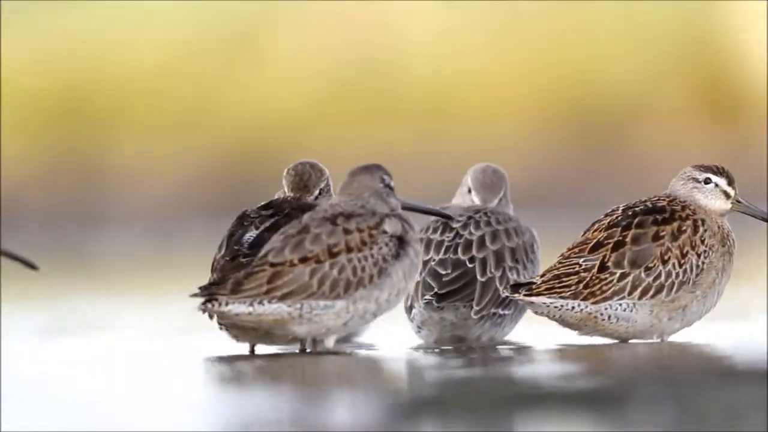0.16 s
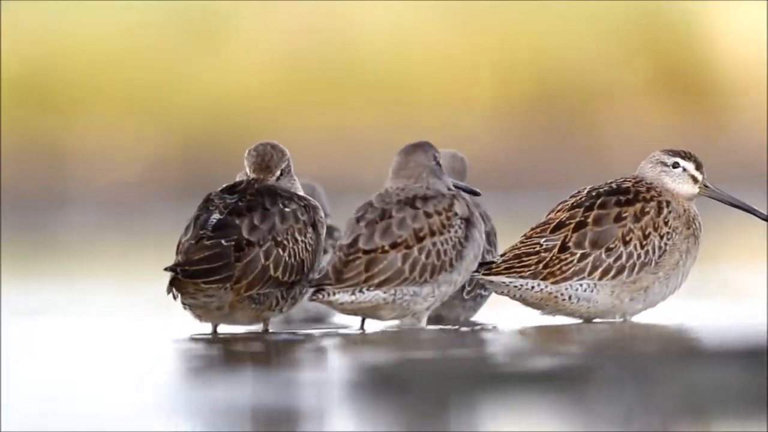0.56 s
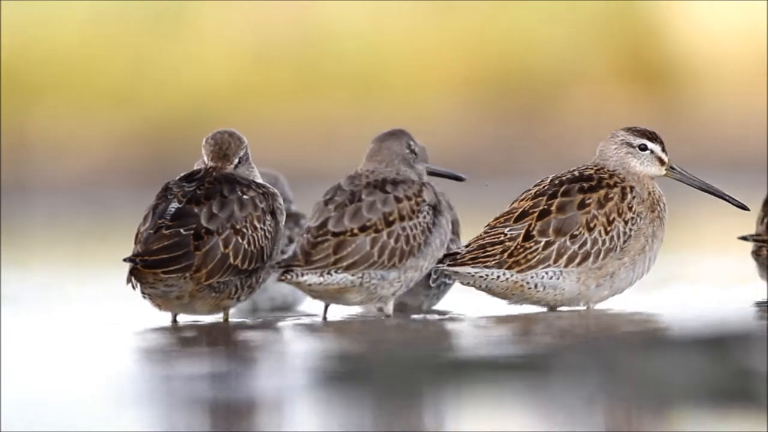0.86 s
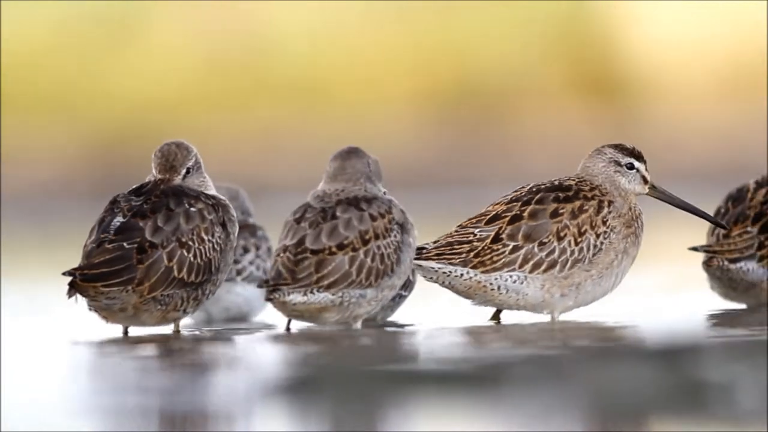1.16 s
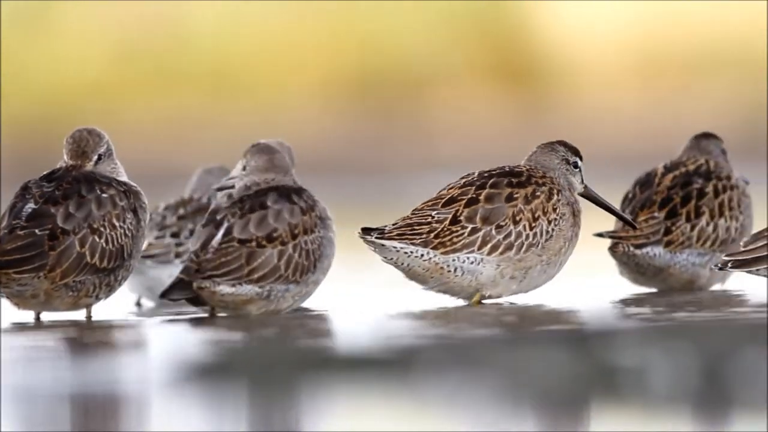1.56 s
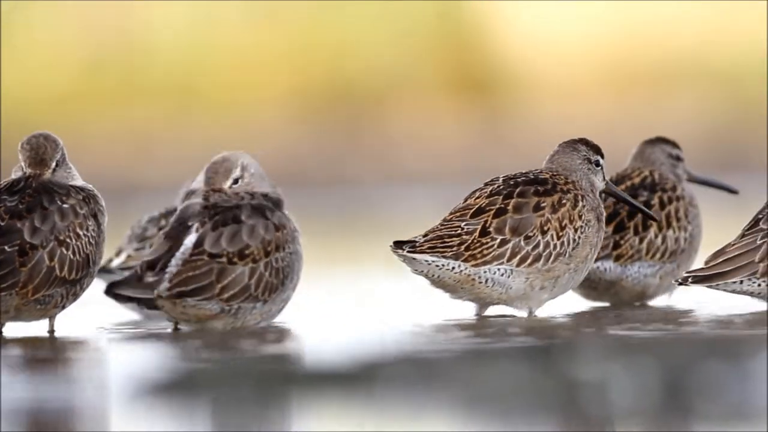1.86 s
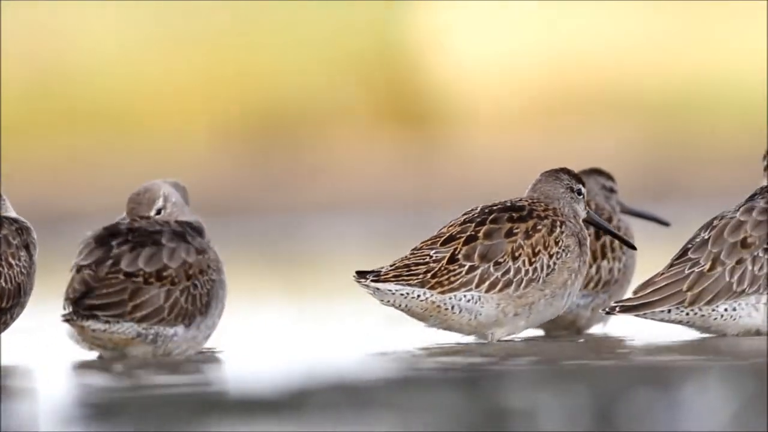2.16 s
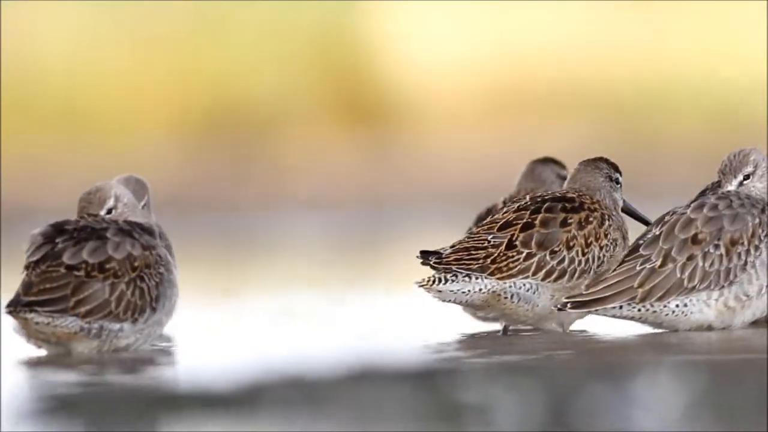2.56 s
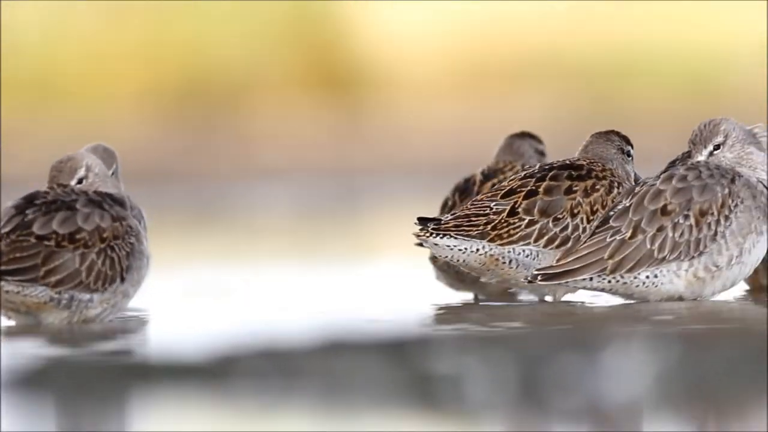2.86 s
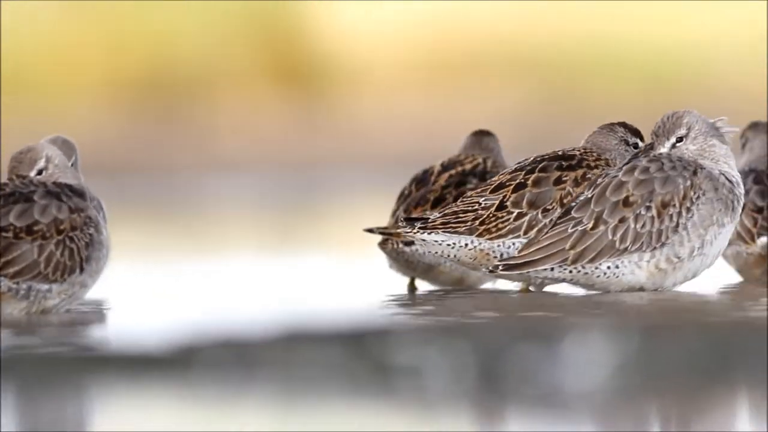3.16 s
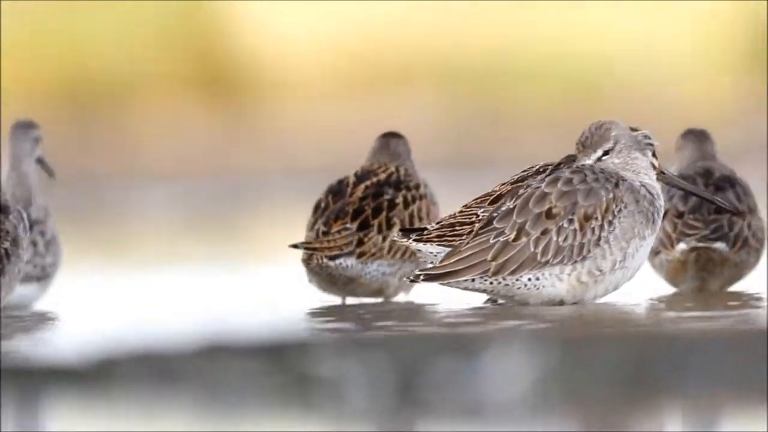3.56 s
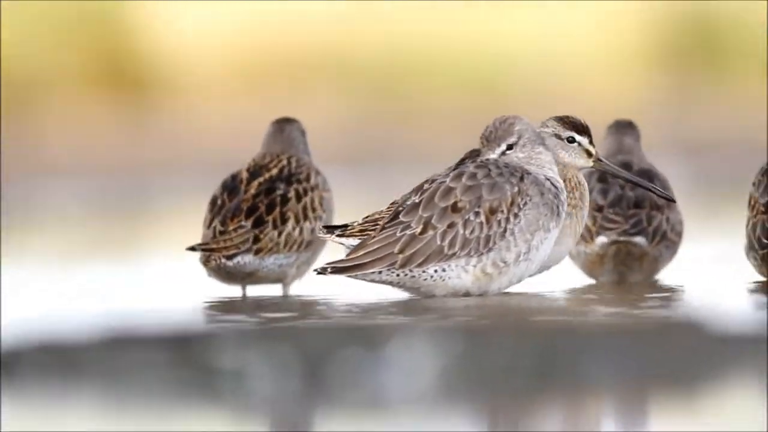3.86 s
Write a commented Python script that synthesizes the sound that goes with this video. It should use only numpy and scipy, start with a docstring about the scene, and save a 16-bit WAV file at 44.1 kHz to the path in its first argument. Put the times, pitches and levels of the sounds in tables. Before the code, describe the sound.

Low wind buffets strike an unprotected microphone, strongest at the end, over faint far wash and engine hum; resting shorebirds give faint peeps, one raspy call and a short arched squeak, with a dry click nearby.

```python
"""Shorebirds in the wind

Shorebirds rest in shallow water on a windy day, a few metres from a bare microphone.
Eddies of wind thump as short pressure swings, over a far wash of shaped noise and a faint engine of sines.
Birds squeak, squawk, chirp and peep with gliding tones; a near part snaps once and ticks twice, ringing."""
import sys
import numpy as np
from scipy import signal
from scipy.fft import rfft, irfft
from scipy.io import wavfile
from scipy.ndimage import uniform_filter1d

SR = 44100
rng = np.random.default_rng(int(sys.argv[2]) if len(sys.argv) > 2 else 0)


def int16_out(signal):
    """Quantize to a 16-bit WAV file."""
    q = np.round(np.clip(np.atleast_2d(signal).T, -1, 1) * 32767)
    wavfile.write(sys.argv[1], SR, q.astype(np.int16))


def volts(x):
    """Linear amplitude factor 10**(x/20) for a level x in dB, scalar or array-like."""
    e = np.asarray(x, float) / 20
    return 10 ** e


N = 176400  # samples, 4 s


def evened(x):
    """Scales to rms 1."""
    return x / np.sqrt(np.mean(x ** 2) + 1e-20)


def add(mix, s, sound):
    """Mixes a sound in at time s."""
    part = mix[max(round(s * SR), 0):][:len(sound)]
    part += sound[:len(part)]


def drift(low_hz, high_hz):
    """Slow random motion of rms 1: sines between two rates, the slower ones larger."""
    t = np.arange(N) / SR
    rates = np.geomspace(low_hz, high_hz, num=16)
    return evened(sum(np.sin(2 * np.pi * (f * t + rng.random())) / np.sqrt(f) for f in rates))


def wobbly(count, size):
    """Smooth noise of rms 1, averaged twice over size samples."""
    noise = rng.standard_normal(count)
    return evened(uniform_filter1d(uniform_filter1d(noise, size), size))


def glide(length, *pitches):
    """Progress 0-1, pitch and cycles along a rounded path through evenly spaced pitches."""
    u = np.arange(0, length, 1 / SR) / length
    hz = np.interp(u, np.linspace(0, 1, len(pitches)), pitches)
    hz = uniform_filter1d(hz, size=len(u) // max(len(pitches) - 1, 2), mode="nearest")
    return u, hz, np.cumsum(hz) / SR


WASH_DB, PATCH_DB, SWELL_DB = -38, .45, .3  # overall level; rms depth of the patches and the swell
# Spectrum of far wind and water: (frequency [Hz], relative level per Hz [dB])
WASH_SPECTRUM = [(24, -25), (40, -9), (87, -7), (300, -14), (450, -19.5), (536, -16.5), (724, -20),
                 (800, -20), (1080, -21.5), (1320, -30), (1960, -38), (2230, -35.5), (3240, -43.5),
                 (6040, -47.5), (15600, -59.5)]


def wash():
    """Far wind and water: random spectra with faint patches, coloured, under a slow swell."""
    frames, bins = N // 128 + 5, 257
    real, imaginary, patches = rng.standard_normal((frames, bins, 3)).T
    patches = uniform_filter1d(patches, size=8, axis=0)  # across frequency
    patches = evened(uniform_filter1d(patches, size=16, axis=1))  # across time
    spectra = (real + 1j * imaginary) * volts(PATCH_DB * patches)
    flat = signal.istft(spectra, nperseg=512, noverlap=384)[1][:N]
    hz, db = np.transpose(WASH_SPECTRUM)
    colour = volts(np.interp(np.log(np.fft.rfftfreq(N, 1 / SR) + 1), np.log(hz), db))
    swell = volts(WASH_DB + SWELL_DB * drift(0.369, 6))
    return swell * evened(irfft(rfft(flat) * colour, N))


DRONE_HZ, DRONE_WAVER = 80.13, 0.003016  # base pitch; rms waver as a fraction of it
DRONE_FADE_DB = 2.2  # rms rise and fall of each multiple
# Tones of the engine: (multiple of the base pitch, relative level [dB])
DRONE_TONES = [(3, -52), (4, -52.5), (5, -53.5), (7, -61), (10, -62)]
# Gain on the drone as the wind carries it: (time [s], level [dB])
DRONE_CARRY = [(0, -12), (.6, 7.5), (2.8, 5.5), (3.1, -6), (4, -1.5)]


def drone():
    """A far engine: a few multiples of one wavering pitch, each coming and going."""
    turns = np.cumsum(DRONE_HZ * (1 + DRONE_WAVER * drift(0.2043, 3.004))) / SR
    tones = np.zeros(N)
    for k, db in DRONE_TONES:
        fade = volts(db + DRONE_FADE_DB * drift(1, 8))
        tones += fade * np.sin(2 * np.pi * (round(k) * turns + rng.random()))
    return volts(np.interp(np.arange(N) / SR, *np.transpose(DRONE_CARRY))) * tones


EDDY_REACH = 1764  # samples either side of the centre, 40 ms
EDDY_TURNS, EDDY_LINGER = 0.44, 1.3  # rise width in cycles; tail width over rise width
EDDY_SAG, EDDY_STEEP = .25, 0.33  # strength of the pitch fall; sharpening of the swing


def eddy(hz, phase):
    """One short pressure swing, quick to rise and slower to die, whose pitch sags; centred in 80 ms."""
    u = np.arange(-EDDY_REACH, EDDY_REACH) / SR * hz / EDDY_TURNS
    bend = EDDY_SAG * np.log(np.cosh(u))
    shape = np.exp(-(u / np.where(u > 0, EDDY_LINGER, 1)) ** 2 / 2)
    angle = 2 * np.pi * (EDDY_TURNS * (u - bend) + phase)
    return shape * np.cos(angle + EDDY_STEEP * np.sin(angle))


EDDIES_PER_S, EDDY_LOW_HZ, EDDY_HIGH_HZ = 80, 52, 300
EDDY_SPREAD_DB = 2.5  # scale of the random boost, which stops at three times this
# Level of the stream of small eddies: (time [s], level [dB])
GUSTS = [(0, -28), (.45, -33), (.65, -34), (.9, -29), (1.35, -38), (1.6, -29.5), (2.0, -32), (2.3, -29),
         (2.7, -29.5), (3.0, -38), (3.3, -29.5), (3.7, -28.5), (3.8, -32.5), (4, -13)]


def small_eddies():
    """A random stream of small pressure swings in twelve pitches, following the gusts."""
    boost = volts(EDDY_SPREAD_DB * np.minimum(rng.exponential(1, N), 3))
    size = boost * (rng.random(N) < EDDIES_PER_S / SR)
    pitches = np.geomspace(EDDY_LOW_HZ, EDDY_HIGH_HZ, num=12)
    kind = rng.integers(0, len(pitches), N)
    stream = np.zeros(N)
    for k, hz in enumerate(pitches):
        stream += signal.oaconvolve(size * (kind == k), eddy(hz, rng.random()), "same")
    s, db = np.transpose(GUSTS)
    return volts(np.interp(np.arange(N) / SR, s, db)) * evened(stream)


THUMP_SKEW, THUMP_LEAD_S = .4, .001  # range of phase [cycles]; the swing centres this far ahead of its time
# The strongest eddies: (time [s], peak level [dB], pitch at the centre [Hz])
STRONG_EDDIES = [(0.0556, -15, 420), (0.0572, -9.5, 200), (0.1038, -22.5, 133), (0.2645, -16.5, 83),
                 (0.2790, -14, 350), (0.2869, -7, 124), (0.2960, -19, 300), (0.3017, -15.5, 128),
                 (0.4501, -15.5, 130), (0.7587, -18.5, 123), (0.8146, -13, 145), (1.211, -12.5, 133),
                 (1.4738, -16.5, 115), (1.5805, -18.5, 97), (1.6571, -18.5, 136), (1.6871, -5, 118),
                 (1.7966, -19.5, 97), (1.9252, -15, 130), (1.9461, -14, 121), (2.0915, -21.5, 92),
                 (2.2071, -12, 154), (2.2329, -17, 107), (2.2642, -12, 149), (2.2725, -18, 310),
                 (2.2828, -17.5, 357), (2.2879, -5.5, 107), (2.3204, -17.5, 138), (2.3741, -13, 123),
                 (2.4032, -12.5, 111), (2.5971, -19.5, 295), (2.6009, -10.5, 116), (3.1026, -18, 109),
                 (3.2031, -14, 140), (3.2845, -19, 250), (3.3163, -13.5, 102), (3.4019, -11, 104),
                 (3.4589, -17, 110), (3.5114, -11, 122), (3.6057, -11.5, 101), (3.63, -21, 287),
                 (3.6339, -9.5, 138), (3.6578, -10, 176), (3.6742, -14, 129), (3.8671, -8.5, 127),
                 (3.8832, -18, 300), (3.8862, -2.5, 117), (3.9295, -7.5, 180), (3.9461, -20.5, 287),
                 (3.9483, -12, 172), (3.9652, -20, 426), (3.9785, -16, 120)]


def thumps():
    """Strong eddies strike the bare microphone, the crest of each push leaning by chance."""
    out = np.zeros(N)
    for s, db, hz in STRONG_EDDIES:
        phase = THUMP_SKEW * (rng.random() - .7)
        add(out, s - EDDY_REACH / SR - THUMP_LEAD_S, volts(db) * eddy(hz, phase))
    return out


def ring(modes):
    """A small hard part rings briefly: decaying sines, each with a soft onset."""
    t = np.arange(0, .04, 1 / SR)
    return sum(volts(db - 60 * t / t60) * np.sin(2 * np.pi * (hz * t + rng.random())) * (1 - np.exp(-t * hz))
               for hz, db, t60 in modes)


# Modes of the ticking part: (frequency [Hz], relative level [dB], 60 dB decay [s])
TICK_MODES = [(13100, 0, .004), (9000, -8, .003), (11300, -8, .003), (14800, -7, .003)]
# Strokes, three close together making the first tick: (time [s], level [dB])
TICK_STROKES = [(3.5812, -50), (3.5817, -46), (3.5824, -48), (3.8193, -42)]


def ticks(mix):
    """Adds two high ticks, every stroke ringing the modes afresh."""
    for s, db in TICK_STROKES:
        add(mix, s, volts(db) * ring(TICK_MODES))


SNAP_S, SNAP_DB = 3.2816, -25.5
# Modes of the snapping part: (frequency [Hz], relative level [dB], 60 dB decay [s])
SNAP_MODES = [(800, 0, .016), (1130, 5, .02), (1750, -2, .008), (2350, -4, .008), (3350, 0, .005),
              (4100, 3, .005), (5150, 7, .005), (5650, 5, .005), (8300, -2, .003), (10300, -7, .002),
              (13300, -14, .002)]
# The break, its echo off a near surface, a second step: (delay [s], relative level [dB])
SNAP_STEPS = [(0, 0), (.000077, -1), (.0014, -9)]


def snap(mix):
    """Adds one snap: the same short ring repeated by the break, its echo and a second step."""
    sound = ring(SNAP_MODES)
    for later, db in SNAP_STEPS:
        add(mix, SNAP_S + later, volts(SNAP_DB + db) * sound)


# Thin far peeps: (time [s], length [s], level [dB], start [Hz], end [Hz], wobble [Hz])
FAR_PEEPS = [(.05, 0.011, -59, 3900, 4050, 1), (.999, 0.065, -63.5, 5580, 5830, 150),
             (1.326, 0.045, -63, 5950, 4250, 120), (2.871, .036, -64, 7720, 7050, 1),
             (3.842, 0.021, -65, 4950, 5240, 1.2)]


def peep(length, db, start_hz, end_hz, wobble_hz):
    """A thin whistle that slides and wobbles."""
    t = np.arange(0, length, 1 / SR)
    u = t / length
    wobble = wobble_hz * np.sin(2 * np.pi * 1.55 * u)  # 1.55 wobbles in each peep
    hz = start_hz + (end_hz - start_hz) * u + wobble
    return volts(db) * np.sin(np.pi * u) ** .5 * np.sin(2 * np.pi * np.cumsum(hz) / SR) * np.sqrt(2)


THROAT_HZ, THROAT_OCTAVES = 3900, 0.43  # centre and standard deviation of the resonance
# Multiples 1-3 before the throat: (relative level [dB])
CHIRP_MULTIPLES = [-12, 2, 2]
# Rising chirps: (time [s], length [s], level before the throat [dB], then pitches at even steps [Hz])
RISING_CHIRPS = [(.758, .032, -56.5, 1050, 1160, 1330, 1500), (3.138, 0.027, -64, 1040, 1520),
                 (3.37, .026, -62, 1210, 1860), (3.857, .015, -56, 2200, 2980),
                 (3.859, .026, -52.5, 970, 1710), (3.866, .013, -59, 2210, 2790),
                 (3.884, .028, -64, 1030, 1570)]


def chirp(length, db, *pitches):
    """Multiples of a rising, slightly shaky note, heard only where they cross the throat resonance."""
    u, hz, turns = glide(length, *pitches)
    turns = turns + .025 * wobbly(len(u), size=40)
    tones = np.zeros(len(u))
    for k, tone_db in enumerate(CHIRP_MULTIPLES, 1):
        throat = np.exp(-.5 * (np.log2(k * hz / THROAT_HZ) / THROAT_OCTAVES) ** 2)
        tones += volts(tone_db) * throat * np.sin(2 * np.pi * k * turns)
    return volts(db) * np.sin(np.pi * u) ** 0.7 * tones * np.sqrt(2)


SQUAWK_SHAKE = .09  # rms unsteadiness at the roughest point [cycles]
SQUAWK_LIFT_DB, SQUAWK_FADE_DB = 7, -17  # by the end: second multiple; the others
# Multiples 1-4 before they fade, dip or lift: (relative level [dB])
SQUAWK_MULTIPLES = [4, -9.5, -11.5, -31]
# Colour of the rasp: (centre [Hz], width of two standard deviations [Hz], relative level [dB])
RASP_BANDS = [(2350, 700, 3), (3200, 1100, -4), (4900, 900, -4), (6800, 1400, -13), (10200, 2600, -21)]
# Hoarse call: (time [s], length [s], level [dB], then pitches at even steps [Hz])
HOARSE_CALLS = [(1.807, .054, -41.5, 1850, 1740, 1770, 1830, 1940, 1740, 1620, 1450, 1200)]


def squawk(length, db, *pitches):
    """Starts hard and clean, turns to a rasp in the middle; the second multiple carries the end."""
    u, hz, turns = glide(length, *pitches)
    middle = np.exp(-((u - .44) / .29) ** 2)
    turns = turns + SQUAWK_SHAKE * middle * wobbly(len(u), size=24)
    tones = np.zeros(len(u))
    for k, tone_db in enumerate(SQUAWK_MULTIPLES, 1):
        change_db = SQUAWK_LIFT_DB * u ** 4 - 10 * middle if k == 2 else SQUAWK_FADE_DB * u ** 3
        tones += volts(tone_db + change_db) * np.sin(2 * np.pi * k * turns)
    f = np.fft.rfftfreq(len(u), 1 / SR)
    colour = sum(volts(band_db) * np.exp(-.5 * ((f - band_hz) / width * 2) ** 2)
                 for band_hz, width, band_db in RASP_BANDS)
    air = rng.standard_normal(len(u))
    rasp = middle * evened(irfft(rfft(air) * colour, len(u)))
    edges = np.minimum(u / 0.021, 1) * np.minimum((1 - u) / 0.105, 1)
    shape = edges * (0.8 + 0.28 * np.sin(np.pi * u))
    return volts(db) * shape * (tones * np.sqrt(2) + rasp)


# Arched squeaks, the last two sung together:
# (time [s], length [s], level [dB], then pitches at even steps [Hz])
SQUEAKS = [(2.027, 0.042, -54.5, 1070, 1540, 1070),
           (3.683, 0.06, -31, 1640, 1750, 1960, 2240, 2270, 2180, 1950, 1690, 1360),
           (3.695, .051, -45, 2550, 2900, 3030, 2950, 2350)]
# One row per squeak, multiples 1-4: (relative level [dB], ..)
SQUEAK_MULTIPLES = [
    [3, -1, -14, -10],
    [0, -26, -21.5, -40],
    [-2.5, -20, -36, -45],
]
# Unsteadiness of each squeak, growing towards its ends: (rms at the middle [cycles])
SQUEAK_UNSTEADY = [.07, .01, .012]
# How sharply each of multiples 1-4 peaks: (power of the arch [no unit])
SQUEAK_PEAKING = [1.6, 0.05, 1.5, 1.5]


def squeak(length, db, pitches, tones_db, shake):
    """Multiples of an arched note, unsteady at its ends."""
    u, hz, turns = glide(length, *pitches)
    arch = np.sin(np.pi * u)
    unsteady = np.minimum(shake * (4 - 3 * arch), .09)  # fourfold at the ends, up to 0.09 cycles
    turns = turns + wobbly(len(u), size=36) * unsteady
    tones = np.zeros(len(u))
    for k, (tone_db, power) in enumerate(zip(tones_db, SQUEAK_PEAKING), 1):
        tones += volts(tone_db) * arch ** power * np.sin(2 * np.pi * k * turns)
    return volts(db) * tones * np.sqrt(2)


def scene():
    """Background, wind, clicks and birds at one microphone."""
    mix = wash() + drone() + small_eddies() + thumps()
    ticks(mix)
    snap(mix)
    for table, voice in ((FAR_PEEPS, peep), (RISING_CHIRPS, chirp), (HOARSE_CALLS, squawk)):
        for s, *row in table:
            add(mix, s, voice(*row))
    for row, tones_db, shake in zip(SQUEAKS, SQUEAK_MULTIPLES, SQUEAK_UNSTEADY):
        s, length, db, *pitches = row
        add(mix, s, squeak(length, db, pitches, tones_db, shake))
    return mix[None]


def low_pass(x):
    """Removes everything above the highest recorded frequency."""
    return signal.sosfilt(signal.butter(12, 16530, fs=SR, output="sos"), x)


def record(dry):
    """The microphone's low cut at 42 Hz, then a low-pass at 15850 Hz that closes the top of the treble."""
    low_cut = signal.butter(2, 42, "high", fs=SR, output="sos")
    mix = signal.sosfilt(low_cut, dry)
    mix = signal.oaconvolve(mix, signal.firwin(301, 15850, fs=SR)[None], "same")
    return low_pass(mix)


dry = scene()
out = record(dry)
int16_out(out)
```